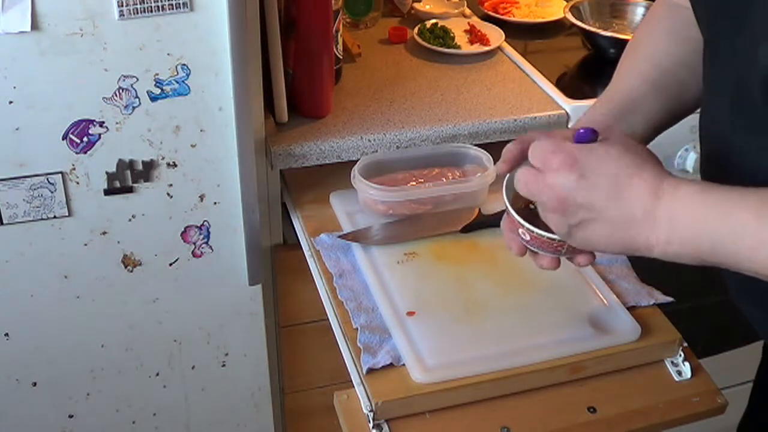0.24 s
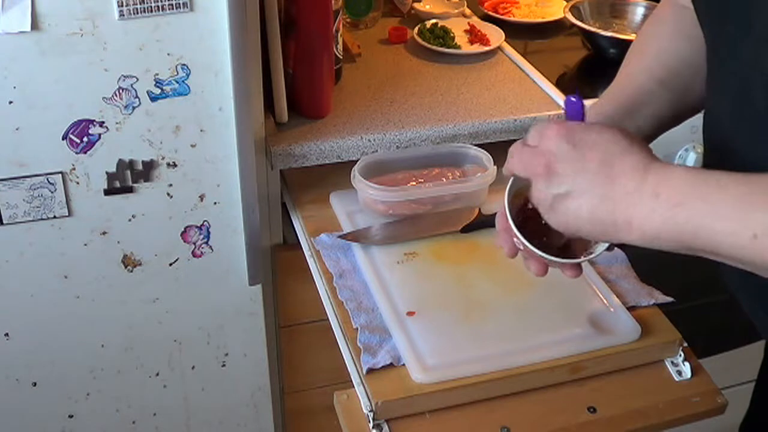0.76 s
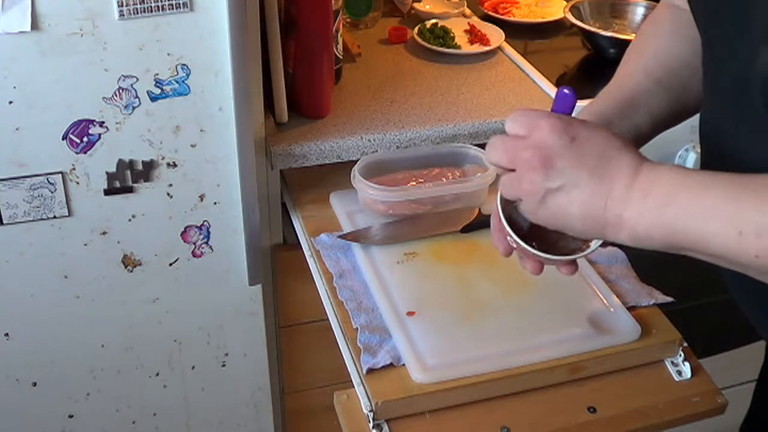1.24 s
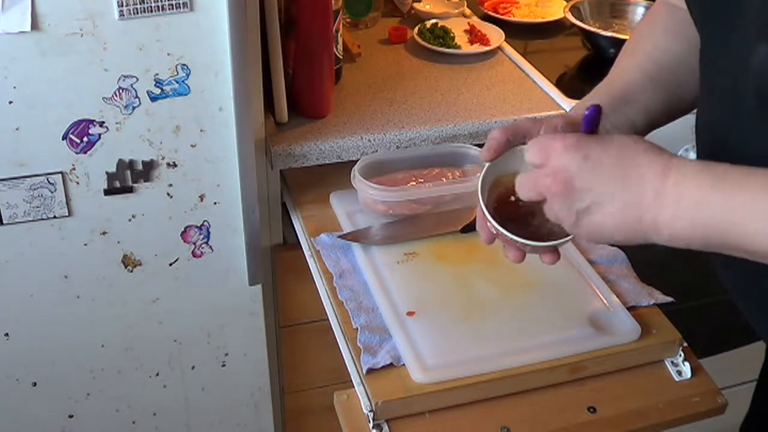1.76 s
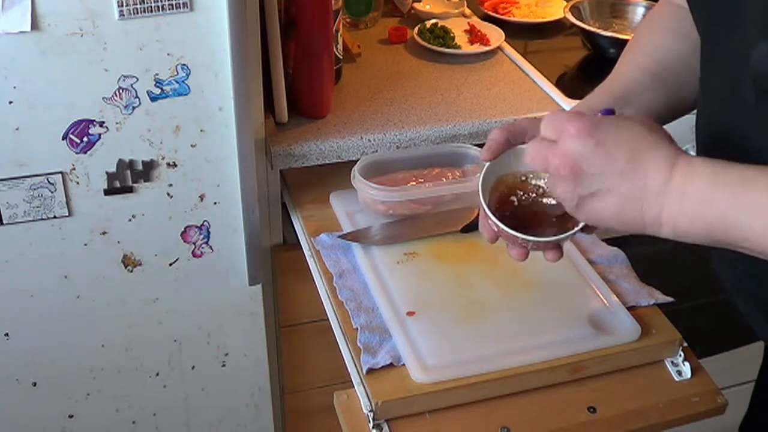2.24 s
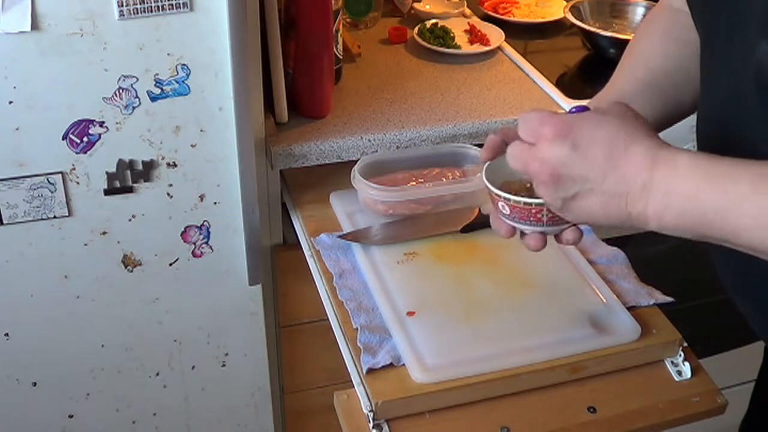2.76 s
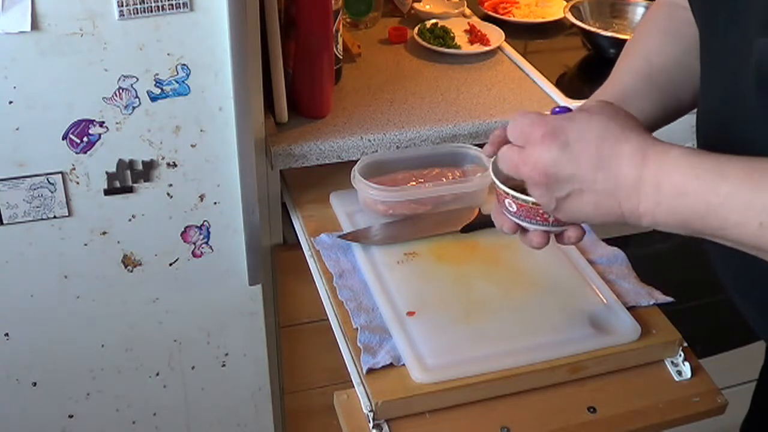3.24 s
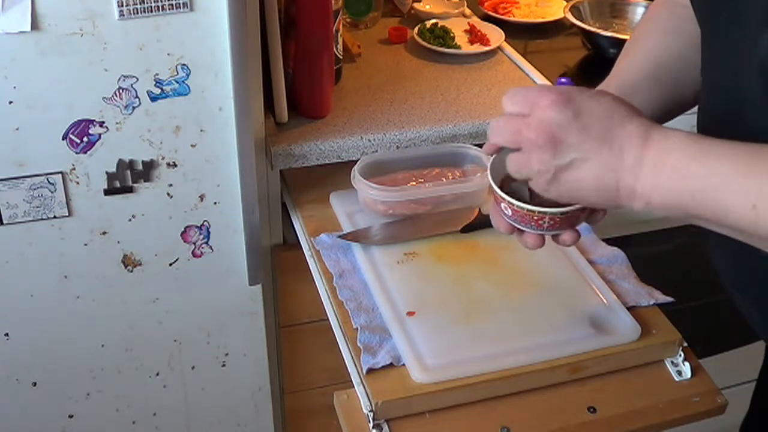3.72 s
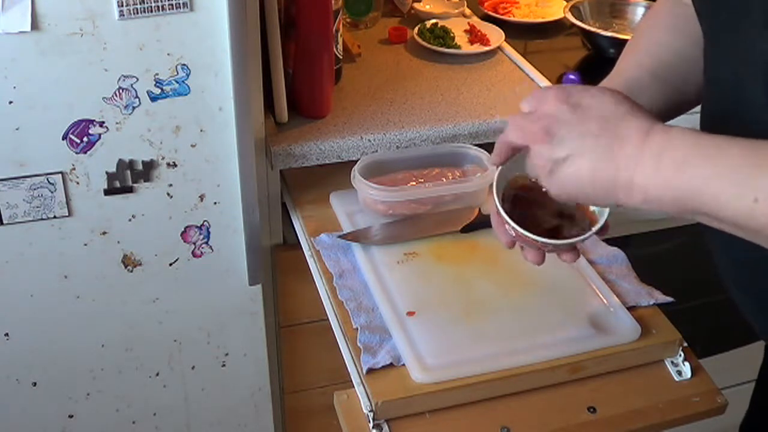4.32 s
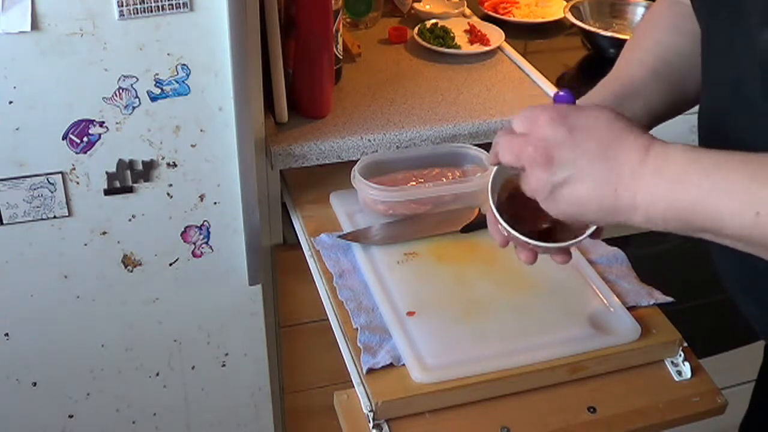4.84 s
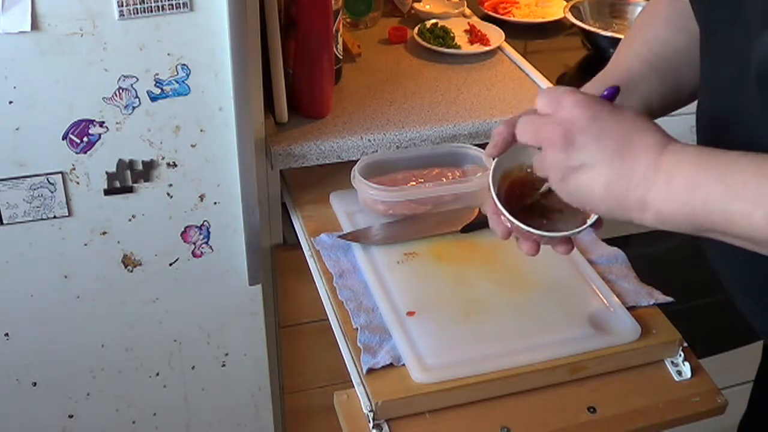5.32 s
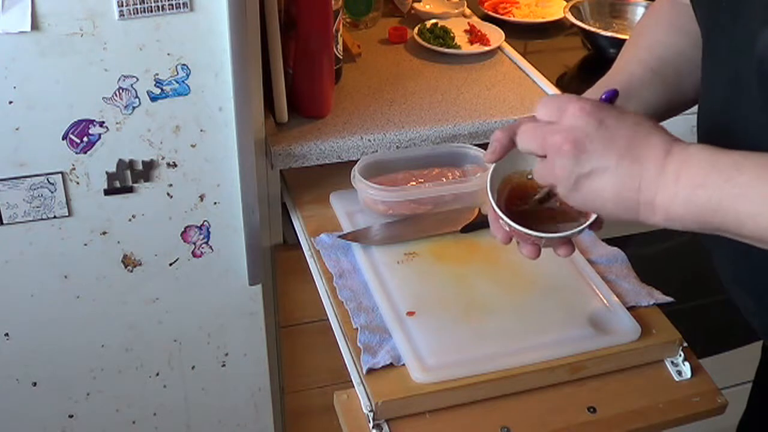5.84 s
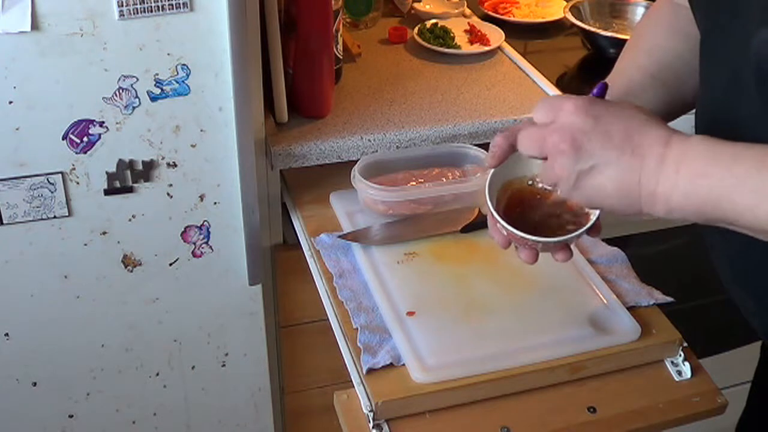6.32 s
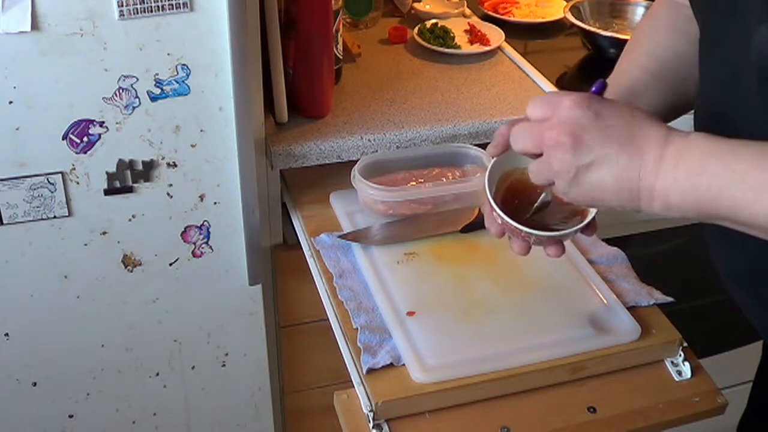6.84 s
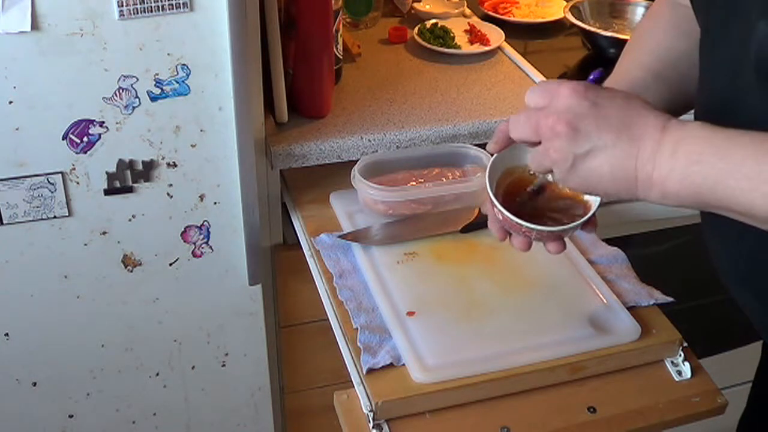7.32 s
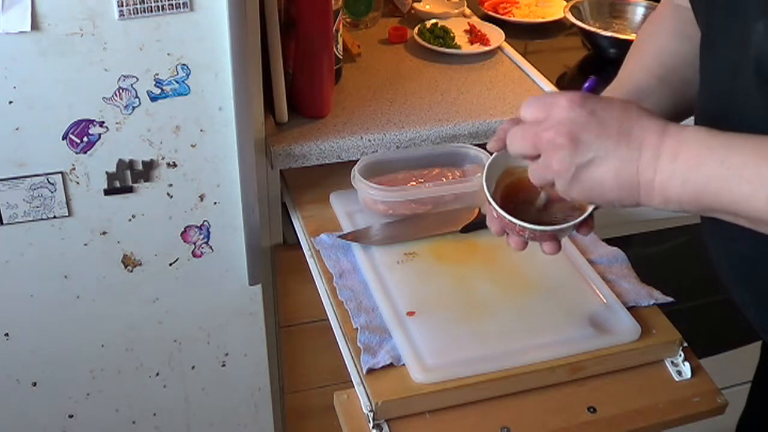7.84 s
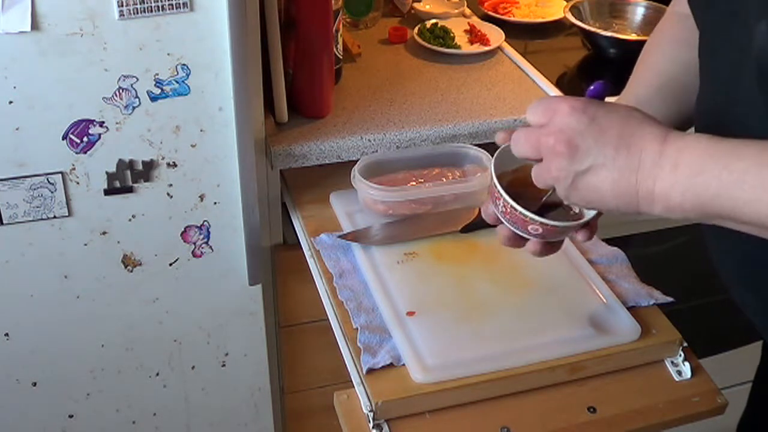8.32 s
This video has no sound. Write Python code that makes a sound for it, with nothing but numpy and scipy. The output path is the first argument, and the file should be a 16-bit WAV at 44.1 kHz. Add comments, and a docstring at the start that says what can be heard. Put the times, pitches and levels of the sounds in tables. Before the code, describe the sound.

A quiet kitchen, faint air and a very thin high whine throughout. From 0 to about 1.5 seconds a metal spoon stirs thin sauce round a small porcelain bowl held in the hand: bright, gritty scrapes five or six times a second, irregular dry clicks, dull knocks and small bubbly gulps, clearest near 0.6. From 1.65 to 2.3 come four separate beating strokes, the last two sharp. Round stirring resumes at 2.4, softer at first, growing scrapier towards 4.8, with a wet gulp near 4.1. A single stroke at 4.9, then from 5.3 to 8.0 even beating at six strokes a second, each crisp tap running straight into a short hissing scrape, many with a tiny gulp. Brief rough spoon notes chirp here and there. A last weaker tap falls at 8.2, then a soft, grainy rubbing hiss from 8.3 to the end. Close small microphone, short, bright room echoes.

```python
"""A metal spoon briskly stirs thin sauce in a small porcelain bowl, held in one hand in a quiet, whining kitchen.
It starts with round stirring: bursts of tiny slips make the scrapes, runs of bubbles make the gulps.
The hand damps the bowl, so taps are short impulses through spoon and bowl: dry clicks and knocks.
A few beating strokes follow, then more turns, then even beating at six strokes a second.
A soft noise hiss, like a rub, comes last; all through, brief echoes made of fading noise give the room."""
import sys
import numpy as np
from scipy import signal
from scipy.fft import rfft, irfft
from scipy.io import wavfile
from scipy.ndimage import uniform_filter1d, minimum_filter1d

SR = 44100
rng = np.random.default_rng(int(sys.argv[2]) if len(sys.argv) > 2 else 0)


def inscribe(sig):
    """Save sig as 16-bit PCM at rate SR to the path in sys.argv[1].

    A 1-D sig is mono; a 2-D sig holds one channel per row.
    Samples are clipped to [-1, 1] before scaling.
    """
    pcm = np.round(np.clip(np.atleast_2d(sig).T, -1, 1) * 32767)
    wavfile.write(sys.argv[1], SR, pcm.astype(np.int16))


N = 377937
TIME = np.arange(N) / SR

# Levels in the tables are starting points; the layers, the room and the microphone adjust them.
# turns of round stirring, a push along the wall and a sweep back: middle of the push t/s,
# push level/dB, sweep level/dB, sweep brightness/dB, rasp pitch f/Hz, rasp level/dB
TURN_TABLE = [(.02, -35.5, -41, 1, 2620, -45), (0.12, -35.5, -34, 5, 1860, -44.5),
              (.275, -35.5, -35, 3, 2620, -44), (.485, -31.5, -33.5, 8, 2550, -44.5),
              (0.661, -29.5, -31, 6, 2780, -48), (.865, -29, -39, -4, 1720, -49),
              (1.033, -29, -31.5, 4, 2400, -47.5), (1.215, -29.5, -29.5, 5, 2950, -47),
              (1.387, -34, -31.5, 4, 2820, -46.5), (2.444, -34.5, -37.5, -2, 1995, -46.5),
              (2.555, -32, -33, -1.5, 2350, -46.5), (2.732, -33, -37.5, 5, 2550, -46),
              (2.895, -35, -39.5, 5, 2100, -47), (3.052, -34, -38.5, -2, 2000, -45),
              (3.222, -32, -38.5, -1, 1900, -44), (3.406, -32, -33, -2, 1970, -42),
              (3.6, -31.5, -31, 4, 2114, -43.5), (3.775, -31.5, -29, -1, 2540, -42.5),
              (3.948, -28.5, -31, 3, 2380, -42), (4.114, -29.5, -37.5, 6, 1840, -44),
              (4.241, -35, -40, 0, 2300, -51), (4.405, -28, -30, 1, 1800, -44.5),
              (4.58, -28.5, -31, 2, 1810, -45.5), (4.754, -29.5, -32.5, 1, 2440, -45.5)]
# beating strokes, the spoon lands and is dragged on: landing t/s, tap level/dB, brightness/dB,
# knock level/dB, time from landing to fastest drag/s, scrape level/dB, rasp pitch f/Hz
STROKE_TABLE = [(1.6575, -28, -4, -65, 0.055, -39.5, 2500), (1.936, -37.5, -18, -58, 0.078, -40, 1970),
                (2.1206, -20, -3.5, -40.5, 0.065, -32, 2010), (2.3045, -22, -1.5, -47, 0.055, -31, 1920),
                (4.9371, -24, -2.5, -62, .064, -32.5, 1810), (5.3429, -25, 1, -60.5, .043, -29, 1930),
                (5.5201, -21.5, 2, -44, 0.044, -26.5, 2750), (5.6829, -22.5, 6, -54, 0.047, -25.5, 1900),
                (5.871, -22, 0, -49, 0.036, -26.5, 1950), (6.0322, -22.5, -12, -55, 0.033, -27, 1900),
                (6.1848, -22.5, -2.5, -58, 0.042, -27, 1770), (6.3535, -20, 3.5, -62, 0.052, -29, 2750),
                (6.5208, -21, -4, -59, 0.044, -28, 2670), (6.6979, -23.5, -4, -59, 0.027, -26.5, 2720),
                (6.849, -30.5, 5, -57, .04, -25.5, 2630), (7.026, -19.5, -3.5, -43, .031, -23.5, 2740),
                (7.176, -29, 2, -59, 0.033, -21.5, 2790), (7.3327, -25.5, 0.5, -70, 0.049, -24.5, 2720),
                (7.5097, -21, -4.5, -56, 0.028, -27, 2780), (7.683, -25.5, 6, -72, 0.033, -31.5, 2560),
                (7.8509, -18.5, -4, -47, 0.039, -27.5, 2700), (8.012, -19.5, -9.5, -64, 0.041, -24.5, 2620),
                (8.2335, -27, -5, -46, 0.02, -44, 2630)]


def undb(db):
    """Turn decibels into a plain factor."""
    return 10 ** (np.asarray(db) / 20)


def unit(x):
    """Scale to an energy of 1."""
    return x / np.sqrt(np.sum(x ** 2) + 1e-18)


def add(track, s, x):
    """Mix x into the track at time s, in seconds."""
    i = int(np.clip(s * SR, 0, N - 1))
    track[i:i + len(x)] += x[:N - i]


def along(points, hz):
    """Read a curve of (Hz, value) points on a log-frequency axis."""
    f, value = np.transpose(points)
    return np.interp(np.log(hz + 1), np.log(f), value)


def background(db=-60.5, whine_db=-70, whine_hz=15626):
    """Quiet kitchen air is coloured noise; the thin whine of an appliance is one high sine."""
    # colour of the kitchen air: f/Hz, relative level/dB
    air_colour = [(25, -18), (60, -8), (110, -9.5), (155, -2.5), (195, -11), (280, 2.5), (600, -0.5),
                  (1100, 4), (2200, -4.5), (4000, -4.5), (7500, -4.5), (12000, -7), (15500, -38)]
    colour = undb(along(air_colour, np.fft.rfftfreq(N, 1 / SR)))

    def air():
        noise = irfft(rfft(rng.standard_normal(N)) * colour, N)
        return unit(noise) * np.sqrt(N)

    mid, side = air(), air()
    whine = undb(whine_db) * np.sqrt(2) * np.sin(2 * np.pi * whine_hz * TIME)
    return undb(db) * (mid + 0.46 * side * np.array([[1], [-1]])) + whine


def response(points, bright_db=0, patchy_db=0, spread_s=0.000879, size=2048):
    """A smeared impulse of a given colour; brightness tips the treble, each contact point favours other modes."""
    hz = np.fft.rfftfreq(size, 1 / SR)
    tilt = np.clip(np.log2((hz + 1) / 7500) / 0.98, -.5, .5)
    patches = signal.resample(rng.standard_normal(size=44), len(hz))
    db = along(points, hz) + bright_db * tilt + patchy_db * patches
    # fold the cepstrum so that the energy comes as early as it can
    cepstrum = irfft(np.log(undb(db)))
    cepstrum[1:size // 2] *= 2
    cepstrum[size // 2 + 1:] = 0
    # bending waves travel at different speeds, which smears the click
    delay = spread_s * (1 + np.sin(2 * np.pi * (hz / 4300 + rng.random()))) / 2
    phase = 2 * np.pi * np.cumsum(delay) * hz[1]
    return unit(irfft(np.exp(rfft(cepstrum) - 1j * phase)))


def bowl(hz, octaves, size=2048):
    """The hand-damped bowl rings in fading modes, driven most strongly around hz."""
    # modes of the bowl: f/Hz, width/Hz, relative strength/dB
    bowl_modes = [(280, 15, 10), (373, 30, -4), (500, 70, -2), (517, 30, 0.5), (766, 16, -18), (934, 18, 0),
                  (1020, 20, -15), (1281, 30, 29.5), (1812, 108, 19.5), (1906, 73, 3.5), (2470, 57, 6),
                  (2670, 240, 34), (3336, 250, 16)]
    t = np.arange(size) / SR
    ring = np.zeros(size)
    for f, width, db in bowl_modes:
        drive = np.exp(-.5 * (np.log2(f / hz) / octaves) ** 2)
        fade = np.exp(-np.pi * width * t)  # a wider mode dies sooner
        ring += drive * undb(db) * width * fade * np.sin(2 * np.pi * f * t)
    return unit(ring)


def slides():
    """Every slide along the wall, two a turn and one a stroke.

    Gives middle t/s, length/s, hiss level/dB, brightness/dB, rasp pitch f/Hz, rasp level/dB.
    """
    push_s, push_bright_db, sweep_s = 0.029, -2.5, .034
    longest_turn_s, sweep_share = .178, .47  # the sweep comes this far into a turn
    drag_share, drag_bright_db = .63, -2.9  # length of a drag as a share of its run-up
    # the rasp of a drag grows more slowly than its hiss (dB per dB)
    rasp_db, rasp_at_hiss_db, rasp_slope = -43, -27.5, 0.5
    rows = []
    periods = np.minimum(np.diff([turn[0] for turn in TURN_TABLE], append=np.inf), longest_turn_s)
    for (s, push_db, sweep_db, sweep_bright, hz, turn_rasp_db), period in zip(TURN_TABLE, periods):
        rows.append((s, push_s, push_db, push_bright_db, hz, turn_rasp_db))
        rows.append((s + sweep_share * period, sweep_s, sweep_db, sweep_bright, hz, turn_rasp_db))
    for s, _, _, _, run_up, db, hz in STROKE_TABLE:
        drag_rasp_db = rasp_db + rasp_slope * (db - rasp_at_hiss_db)
        rows.append((s + run_up, drag_share * run_up, db, drag_bright_db, hz, drag_rasp_db))
    return rows


def slips(length, rate, spread_db, grip_db, size=8192):
    """A swell of tiny stick-slip impulses, stronger and weaker as the grip comes and goes, centred in its window."""
    t = (np.arange(size) - size / 2) / SR
    chance, push = rng.random(size), rng.standard_normal(size)
    strength = rng.uniform(-1.3, 1, size)
    grip = np.tanh(uniform_filter1d(rng.standard_normal(size), size=100) * np.sqrt(100))
    swell = 2 ** (-2 * (t / length) ** 2)
    impulses = (chance < rate / SR) * np.sign(push)
    return unit(impulses * undb(spread_db * strength + grip_db * grip) * swell)


def scrapes(body_db=-6, patchy_db=3, hollow_width_hz=380, count=3):
    """Contact points slip and hiss in the spoon; together they rasp in the bowl and the hollow behind the spoon."""
    # colour of the scraping spoon: f/Hz, relative level/dB
    hiss_colour = [(400, -30), (1000, -80), (3000, -14.5), (4700, -3.5), (5750, 5.5), (6150, 6), (6750, 8),
                   (7700, 9.5), (8700, 1.5), (9500, 2.5), (11000, -4), (13000, -15), (15500, -12.5)]
    out, body, t = np.zeros(N), bowl(4750, 0.33), np.arange(2048) / SR
    for s, length, db, bright, hz, rasp_db in slides():
        forces = [slips(length, rate=1900, spread_db=9, grip_db=9.5) for _ in range(count)]
        hiss = sum(signal.fftconvolve(force, response(hiss_colour, bright + 3.76, patchy_db))
                   for force in forces)
        # the hollow changes size, and so pitch, from stroke to stroke
        hollow = np.exp(-np.pi * hollow_width_hz * t) * np.cos(2 * np.pi * hz * t)
        rasp = unit(signal.fftconvolve(sum(forces), hollow))
        bowl_rasp = unit(signal.fftconvolve(sum(forces), body))
        sound = unit(hiss) * undb(db) + undb(rasp_db) * (rasp + bowl_rasp * undb(body_db))
        start = s - len(forces[0]) / 2 / SR
        skipped = int(max(-start, 0) * SR)  # whatever falls before the beginning is left out
        add(out, max(start, 0), np.sqrt(length * SR) * sound[skipped:])
    return out


def pockets():
    """Every air pocket: a quiet one behind each push, and the loud ones.

    Gives t/s, length/s, pitch f/Hz, level/dB.
    """
    # loud air pockets close in the sauce: t/s, pitch f/Hz, level/dB
    loud_pockets = [(.29, 1266, -46.5), (0.602, 872, -34), (0.806, 855, -43), (.999, 1130, -41.5),
                    (1.173, 1154, -39), (1.357, 982, -46.5), (1.513, 1272, -49), (2.122, 993, -47),
                    (3.299, 1157, -46.5), (4.13, 1294, -36.5), (4.506, 1016, -47), (4.538, 947, -47.5),
                    (4.687, 1040, -46.5), (4.713, 933, -39.5), (4.853, 1186, -46), (5.344, 1247, -40),
                    (5.532, 1736, -38.5), (5.686, 1010, -37), (5.872, 1930, -41), (6.033, 1880, -49),
                    (6.185, 1228, -39.5), (6.358, 1695, -37), (6.524, 1250, -43.5), (6.7, 1820, -39.5),
                    (6.848, 1240, -44.5), (7.175, 1270, -42), (7.333, 1200, -38.5), (7.512, 1774, -45.5)]
    lap_hz, lap_db = 1270, -55  # the quiet pocket behind every push
    gulp_cycles = 33  # deeper pockets take longer to close
    laps = [(turn[0], lap_hz, lap_db) for turn in TURN_TABLE]
    return [(s, gulp_cycles / hz, hz, db) for s, hz, db in laps + loud_pockets]


def sauce(glide=0.16, scatter=.12, gulp_db=-2, body_db=-6, deep_db=12, fade_db=6, count=10):
    """A gulp is a quick run of damped bubbles, each rising in pitch, mostly weakening, that also shakes the bowl."""
    out, t, body = np.zeros(N), np.arange(4096) / SR, bowl(590, 0.81)
    cycles = 6  # cycles in which a bubble fades and its pitch rises
    gulps = pockets()
    for (s, length, hz, db), draws in zip(gulps, rng.standard_normal((len(gulps), 3, count))):
        lag, pitch, size = draws
        starts = length * np.maximum(np.arange(count) + 0.321 * lag - .3, 0) / count
        bubble_hz = hz * np.exp(scatter * pitch)
        turns = np.maximum(t - starts[:, None], 0) * bubble_hz[:, None]
        rise = 1 + glide * np.tanh(turns / cycles) / 2
        bubbles = np.exp(-2 * turns / cycles) * np.sin(2 * np.pi * turns * rise)
        run = unit(undb(2 * size - fade_db * starts / length) @ bubbles)
        push = rng.standard_normal(len(t)) * np.exp(-t / length)
        shake = unit(signal.fftconvolve(push, body)[:len(t)])
        shake_db = body_db + deep_db * np.log2(1000 / hz)  # deep pockets shake the bowl most
        gulp = run + undb(shake_db) * shake
        add(out, s, gulp * np.sqrt(length * SR) * undb(db + gulp_db))
    return out


def blows(bright_scatter_db=5, skip_spread=.8):
    """Every blow on the bowl: landings, bumps and chance skips during slides.

    Gives t/s, tap level/dB, brightness/dB, knock level/dB.
    """
    # the spoon bumps the wall while it is moving: t/s, tap level/dB, brightness/dB, knock level/dB
    bump_table = [(.0615, -23.5, -7, -41), (0.1965, -22, -4, -40), (0.3696, -28, -14, -72),
                  (0.6049, -25, -5, -65), (0.6945, -23, 3, -53), (0.8054, -22, -8.5, -36),
                  (.939, -24, -2, -71), (0.9964, -23.5, 7, -40), (1.075, -22, -19, -46),
                  (1.1055, -23.5, 13, -67), (1.1848, -24.5, -5, -48), (1.2436, -28, -1, -56),
                  (1.365, -30, -13, -39), (1.4343, -23.5, 13, -64), (2.5724, -29, -7, -66),
                  (2.806, -28, -17, -71), (2.904, -27.5, 6, -70), (3.0346, -27.5, 7, -64),
                  (3.1952, -29, -1, -56), (3.357, -28.5, -3, -76), (3.677, -27.5, -22, -48),
                  (3.8235, -29, -5, -60), (3.9504, -24, -21, -55), (4.1752, -29.5, -27, -54),
                  (4.2179, -22.5, -5, -38.5), (4.3041, -25, -7, -67), (4.3649, -26, -16, -36.5),
                  (4.5411, -22, -20, -39), (4.7155, -26, -26, -45), (4.7647, -23, -10, -56),
                  (6.8845, -25.5, -5, -68), (7.3573, -26, 2, -58), (8.0645, -24, -6, -62)]
    # a skipping scrape ticks: tick level against the scrape, knock level against the tick
    skip_chance, skip_db, skip_knock_db = .35, -0.5, -36
    rows, moves = [stroke[:4] for stroke in STROKE_TABLE] + bump_table, slides()
    for (s, length, db, bright, _, _), draws in zip(moves, rng.random((len(moves), 3))):
        chance, place, tone = draws
        if chance < skip_chance:
            skip_at = s + skip_spread * length * (2 * place - 1)
            skip_bright = bright + bright_scatter_db * (2 * tone - 1)
            rows.append((skip_at, db + skip_db, skip_bright, db + skip_db + skip_knock_db))
    return rows


def taps(contact_s=0.00056, click_db=1.5, patchy_db=2, rattle_s=0.0059, rattle_db=-7, wobble_s=0.0045):
    """Each tap chatters for about a millisecond, then the spoon rattles on the wall and keeps the bowl's modes going."""
    # colour of the tapping spoon: f/Hz, relative level/dB
    click_colour = [(300, -62), (1000, -29), (2200, -10), (3200, -13.5), (4600, -16), (5700, -9.5),
                    (6300, -3), (6800, 4.5), (7700, 0), (8700, -4), (9600, -3.5), (11000, -9.5),
                    (13000, -15.5), (15500, -22)]
    clink_db, clink_per_bright = -14.5, -0.18  # duller, fuller blows ring the bowl more (dB per dB)
    out, t = np.zeros(N), np.arange(1024) / SR
    knock = bowl(480, 0.87)
    weight = np.sqrt(0.0038 * SR)  # levels count over a few milliseconds
    hits = blows()
    for (s, db, bright, knock_db), noise in zip(hits, rng.standard_normal((len(hits), 2, len(t)))):
        contact = unit(np.sign(noise[0]) * t * np.exp(-t / contact_s))
        rattle = unit(noise[1] * np.sqrt(t) * np.exp(-t / rattle_s))
        spoon = response(click_colour, bright + 0.83, patchy_db)
        click = unit(signal.fftconvolve(contact + undb(rattle_db) * rattle, spoon))
        add(out, s - .0003, weight * undb(db + click_db) * click)
        clink = bowl(1830 * 2 ** rng.normal(0, 0.1), 0.13)  # each spot on the wall favours other modes
        wobble = unit(noise[1] * np.sqrt(t) * np.exp(-t / wobble_s))
        blow = (t == 0) + wobble  # one sharp impulse and the rattle after it
        tap_clink_db = db + clink_db + clink_per_bright * bright
        for modes, level_db in ((clink, tap_clink_db), (knock, knock_db)):
            ring = unit(signal.fftconvolve(blow, modes))
            add(out, s + 0.00054, weight * undb(level_db) * ring)
    return out


def spoon_rings(width_hz=130):
    """The spoon catches on the glaze: a short noise push sets off one brief, rough note."""
    # singing catches: t/s, pitch f/Hz, length/s, level/dB
    ring_table = [(0.346, 2600, 0.042, -42.5), (0.683, 2750, 0.031, -41.5), (1.104, 2230, 0.017, -45),
                  (2.545, 2700, 0.041, -37.5), (2.641, 2280, 0.028, -41.5), (2.905, 2240, 0.021, -42),
                  (3.847, 2720, 0.025, -36), (4.982, 2860, 0.017, -40), (6.413, 3640, 0.014, -39.5),
                  (6.589, 3940, 0.011, -39.5), (7.693, 2690, 0.027, -39.5), (8.067, 3880, 0.026, -35)]
    out, t = np.zeros(N), np.arange(SR // 5) / SR
    for s, hz, length, db in ring_table:
        push = rng.standard_normal(len(t)) * np.exp(-(t / length) ** 2)
        resonance = np.exp(-np.pi * width_hz * t) * np.sin(2 * np.pi * hz * t)
        note = signal.fftconvolve(push, resonance)[:len(t)]
        add(out, s, unit(note) * np.sqrt(length * SR) * undb(db))
    return out


def soft_rub(start_s=8.32, rise_s=0.041, db=-54, grain_db=5):
    """A soft, even, grainy hiss, like a rub, fades in and stays: coloured noise of uneven strength."""
    # colour of the hiss: f/Hz, relative level/dB
    rub_colour = [(300, -7), (1200, -1), (2500, -4.5), (3700, -1), (5000, 2), (7000, -2), (9000, 0),
                  (11000, -15), (15500, -18)]
    grains = rng.standard_normal(N) * undb(grain_db * rng.standard_normal(N))
    fade_in = np.clip((TIME - start_s) / rise_s, 0, 1)
    grains = unit(grains) * np.sqrt(N) * fade_in
    return undb(db) * signal.fftconvolve(grains, response(rub_colour))[:N]


def reflections(width=0.44, size=16384):
    """Left and right echoes for one place of the bowl: early bounces, then a short diffuse tail."""
    # how long the room rings: f/Hz, time to fade by 60 dB/s
    fade_times = [(200, 0.04), (1000, 0.37), (3000, 0.39), (7000, 0.27), (15000, 0.23)]
    t, hz = np.arange(size) / SR, np.fft.rfftfreq(size, 1 / SR)
    density = np.minimum(.1 + t / .03, 1)  # bounces crowd together
    present = rng.random((2, size)) < density
    echoes = rfft(rng.standard_normal((2, size)) * present / np.sqrt(density))
    # each frequency band fades at its own speed
    centres, tail = np.geomspace(125, 16000, 8), np.zeros((2, size))
    for centre, pick in zip(centres, np.eye(len(centres))):
        band = irfft(echoes * along(np.c_[centres, pick], hz))
        tail += band * undb(-60 * t / along(fade_times, centre))
    onset = np.clip((t - .001) / 0.00015, 0, 1)
    mid, side = (unit(v * onset) for v in tail)
    # stereo width, as a factor at each frequency in Hz
    spread = along([(300, 1.1), (1000, 1.27), (7000, 0.95), (9500, 0.86), (11500, 0.023)], hz)
    side = irfft(rfft(side) * spread) * width
    return np.array([mid + side, mid - side])


def room(x, wet_db=-3, direct_db=-3, move_rate=7., count=5):
    """Spoon and bowl keep moving, so the sound passes through a circle of different echoes, move_rate places a second."""
    out = undb(direct_db) * np.array([x, x])
    for place in range(count):
        offset = (TIME * move_rate - place + count / 2) % count - count / 2
        share = np.cos(np.pi / 2 * np.clip(offset, -1, 1))  # equal-power hand-over between places
        echoed = signal.fftconvolve((x * share)[None], reflections(), axes=1)[:, :N]
        out = out + undb(wet_db) * echoed
    return out


def scene(pan_db=-0.63):
    """The bowl, slightly right of centre, is too small to radiate bass; kitchen air lies around it."""
    air = background()
    stirring = scrapes() + sauce() + taps() + spoon_rings() + soft_rub()
    bass_cut = signal.butter(9, 240, "highpass", fs=SR, output="sos")
    pan = undb(np.array([[pan_db], [-pan_db]]) / 2)
    return room(signal.sosfilt(bass_cut, stirring)) * pan + air


def record(dry, ceiling_db=-13.5, size=89, top_hz=15900):
    """A small microphone: a fast limiter holds the tallest peaks, then a steep top cut."""
    gain = np.minimum(undb(ceiling_db) / (np.abs(dry).max(axis=0) + 1e-18), 1)
    # hold each dip for size samples, then smooth it
    gain = uniform_filter1d(minimum_filter1d(gain, size=size), size=size)
    top_cut = signal.ellip(10, .2, 70, top_hz, fs=SR, output="sos")
    return signal.sosfilt(top_cut, dry * gain)


dry = scene()
out = record(dry)
inscribe(out)
```